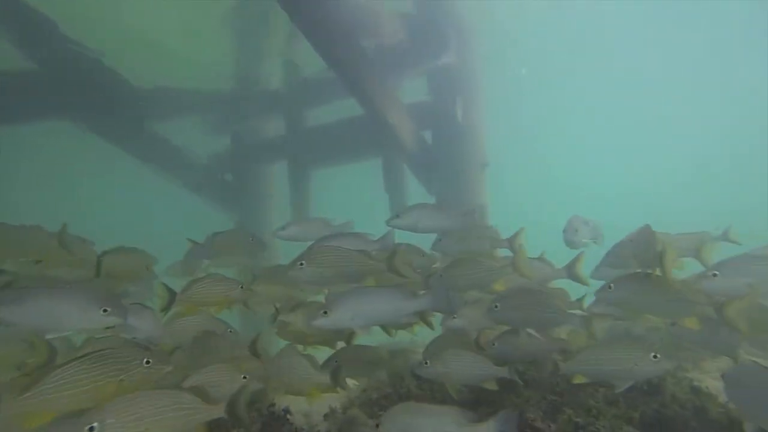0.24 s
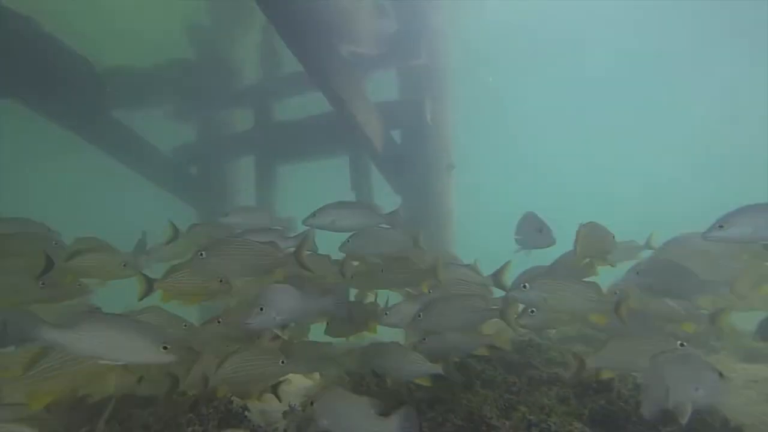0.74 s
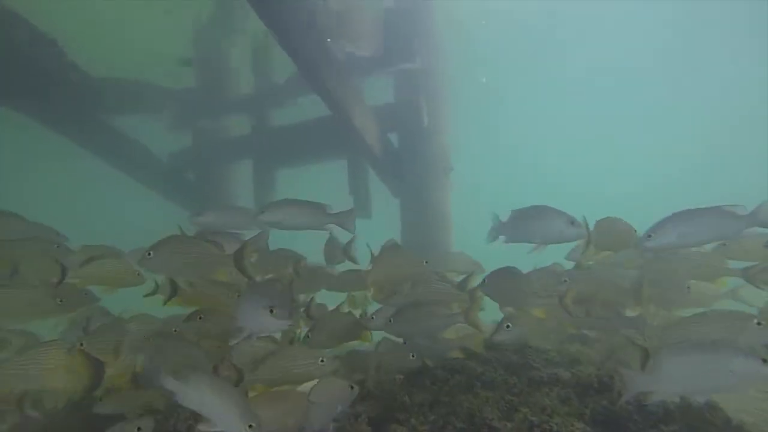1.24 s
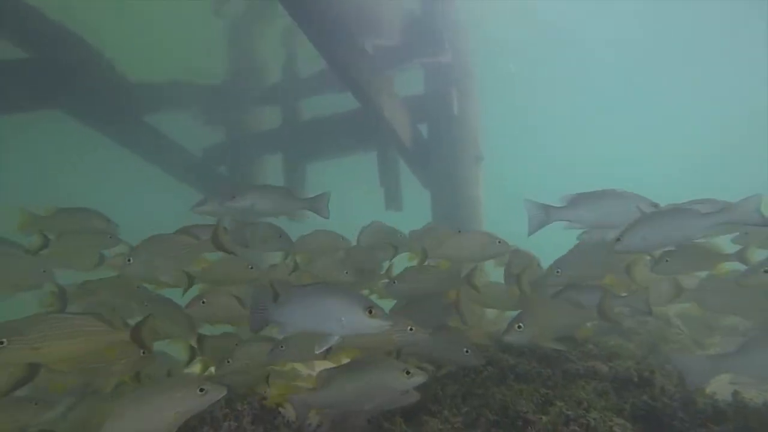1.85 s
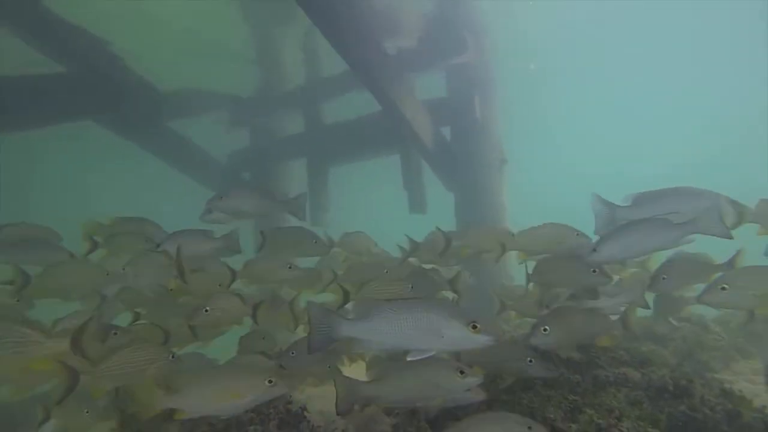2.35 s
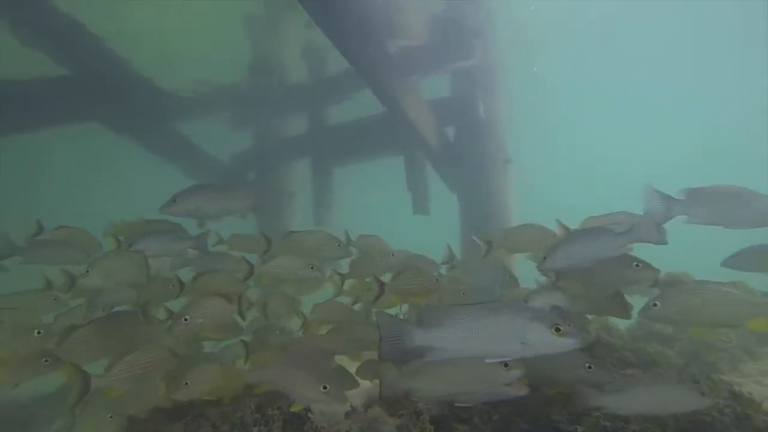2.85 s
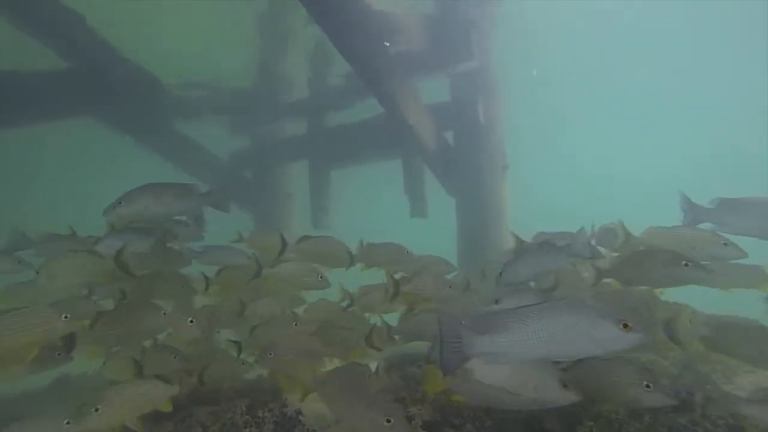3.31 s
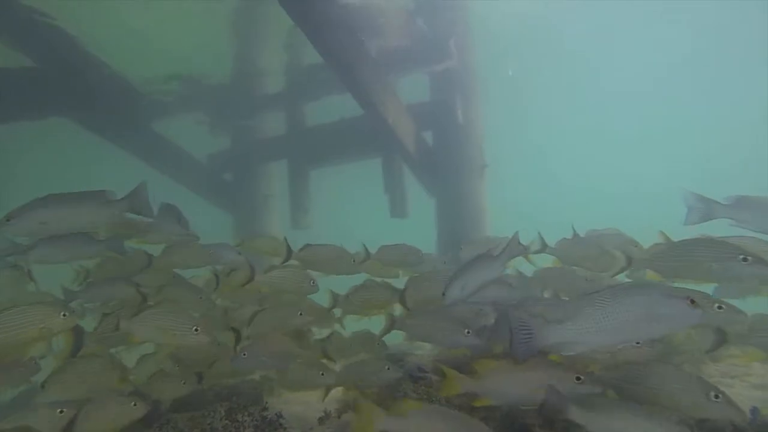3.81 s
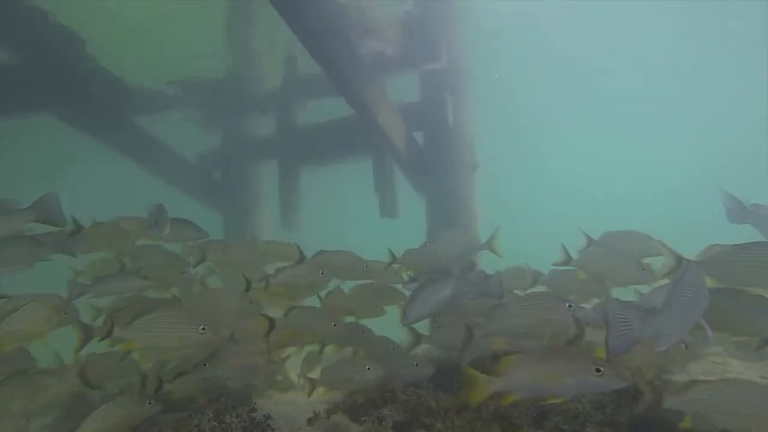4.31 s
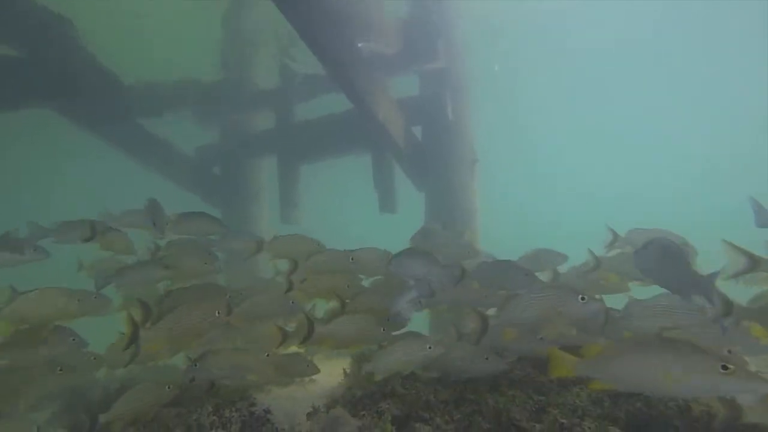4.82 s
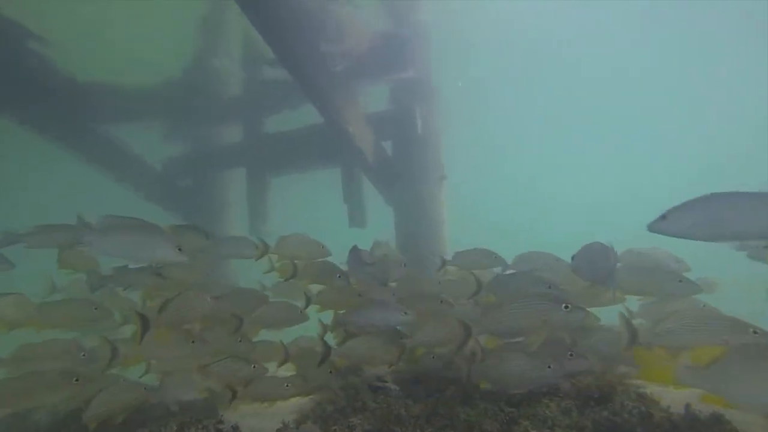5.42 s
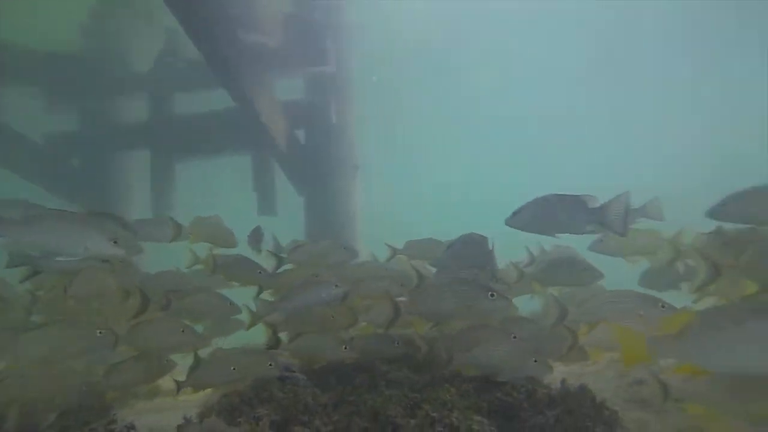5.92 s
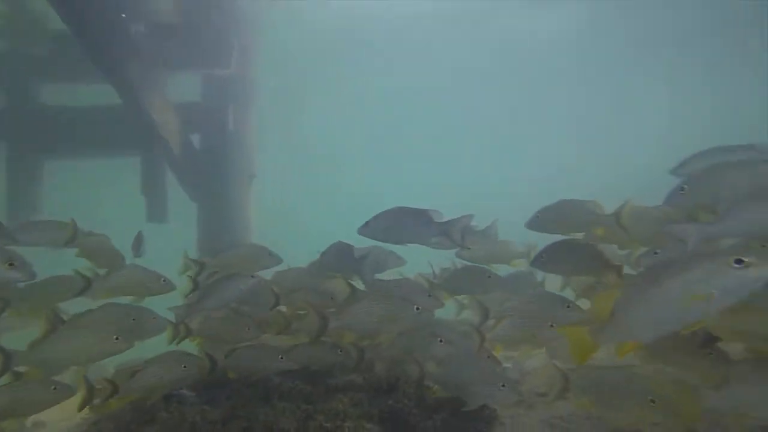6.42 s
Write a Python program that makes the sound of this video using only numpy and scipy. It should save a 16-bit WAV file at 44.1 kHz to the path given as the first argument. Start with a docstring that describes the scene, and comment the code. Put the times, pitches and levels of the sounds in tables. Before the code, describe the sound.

Two motorboats pass underwater, first near, then more distant, with swelling wash and gliding whine, while shrimp click over a low rumble.

```python
"""Under water beside a dock, heard through a camera housing: two motorboats pass, one close, one farther.
Each boat's distance sets its propeller wash, cavitation fizz and roar; its drive whine climbs and sinks.
The water rumbles and hisses, and a distant engine hums and throbs. The camera's electronics add a faint
pulsed whistle. Shrimp snap nearby: each collapsing bubble cracks, rings the housing and echoes."""
import sys
import numpy as np
from scipy import signal
from scipy.fft import rfft, irfft, next_fast_len
from scipy.io import wavfile
from scipy.ndimage import map_coordinates

SR = 44100
rng = np.random.default_rng(int(sys.argv[2]) if len(sys.argv) > 2 else 0)


def master(y):
    """Save y as 16-bit WAV."""
    cut = np.clip(np.atleast_2d(y).T, -1, 1)
    pcm = np.round(cut * 32767)  # scale
    wavfile.write(sys.argv[1], SR, pcm.astype(np.int16))


N = 293706


def amp(db):
    """Decibels to gain."""
    return 10 ** (np.asarray(db) / 20)


def along(points, hz):
    """Interpolate (freq_hz, value) points on a log axis."""
    freqs, values = np.transpose(points)
    return np.interp(np.log(hz + 1), np.log(freqs + 1), values)


def clock():
    """Sample times in seconds."""
    return np.arange(N) / SR


def curve(points):
    """Interpolate (time_s, value) points at every sample."""
    return np.interp(clock(), *np.transpose(points))


def wobble(rate_hz):
    """Smooth random curve, rate_hz knots a second."""
    knots = rng.standard_normal(int(N * rate_hz / SR) + 4)
    return map_coordinates(knots, [clock() * rate_hz])


def filtered(x, response):
    """Apply a gain given as a function of frequency."""
    size = next_fast_len(len(x) + 8192)
    return irfft(rfft(x, size) * response(np.fft.rfftfreq(size, 1 / SR)), size)[:len(x)]


def rush(spectrum):
    """Coloured noise, rms 1."""
    noise = filtered(rng.standard_normal(N), lambda hz: amp(along(spectrum, hz)))
    return noise / np.sqrt(np.mean(noise ** 2) + 1e-20)


def fuzzy_tone(pitch_hz, width_hz, rough):
    """Tone on a pitch curve; rough is the power share scattered into a narrow noise band."""
    scattered = np.sqrt(rough) * (wobble(width_hz) + 1j * wobble(width_hz))
    envelope = np.sqrt(2 * (1 - rough)) + scattered
    return np.real(envelope * np.exp(2j * np.pi * np.cumsum(pitch_hz) / SR))


def distance(closest_s, approach_s, leave_s):
    """Range on a straight course, in closest distances; the boat covers one in approach_s or leave_s."""
    since = clock() - closest_s
    return np.hypot(1, since / np.where(since < 0, approach_s, leave_s))


def range_gain(away, closest_db, loss_db):
    """Shallow water takes loss_db for each added closest distance."""
    return amp(closest_db - loss_db * (away - 1))


# boat roar spectrum: freq_hz, level_db
ROAR_SPECTRUM = [(120, -2.5), (200, 0), (330, -3.5), (410, 2), (510, -9), (600, 3), (680, -11.5),
                 (750, -5.5), (870, -27), (1200, -54.5)]


def roar(away, lowest_hz, reach, edge_db, edge_width):
    """Shallow water cuts the bass: the cutoff rises with range, and the roar dies beyond reach."""
    hz, frame_s, spectra = signal.stft(rush(ROAR_SPECTRUM), SR, nperseg=1024)
    cutoff_hz = np.interp(frame_s, clock(), lowest_hz * away)
    ratio = (hz[:, None] + 1) / cutoff_hz
    highpass = ratio ** 6 / (1 + ratio ** 6)
    edge = amp(edge_db * np.exp(-(np.log(ratio) / edge_width) ** 2))
    swept = signal.istft(spectra * highpass * edge, SR, nperseg=1024)[1][:N]
    return amp(2.5 * wobble(49.78)) * swept / (1 + (away / reach) ** 14)


# drive whine partials: harmonic, level_db
WHINE_PARTIALS = [(2, -13), (3, 0), (4, 0), (5, -17), (6, -13)]
# housing response: freq_hz, gain_db
HOUSING_RESPONSE = [(600, -8), (860, -20), (1030, -2.5), (1150, -9), (1300, -25), (1600, -14), (1800, -3),
                    (1980, 0), (2300, -9), (2700, -4), (3400, -10), (3900, -26)]


def drive_whine(pitch_hz, odd_db, rough):
    """Partials glide through the housing's resonances; multipath in the water adds blur and flutter."""
    whine = np.zeros(N)
    for harmonic, level_db in WHINE_PARTIALS:
        hz = harmonic * pitch_hz
        flutter_db = 2.5 * rough * wobble(16)
        gain = amp(level_db + harmonic % 2 * odd_db + along(HOUSING_RESPONSE, hz) + flutter_db)
        whine += gain * fuzzy_tone(hz, width_hz=90, rough=rough)
    return whine


# propeller wash spectrum: freq_hz, level_db
NEAR_WASH_SPECTRUM = [(470, -21), (800, -17), (873, -17), (992, 5), (1060, 3.5), (1150, -5), (1570, -1),
                      (1700, -0.5), (2010, 1), (2380, -23.5), (2670, -2), (3030, -13), (3340, 2.5),
                      (3820, -21.5), (4000, -43), (5200, -58), (8800, -120)]
# cavitation spectrum: freq_hz, level_db
NEAR_FIZZ_SPECTRUM = [(2240, -37), (3800, -10), (4250, 7.5), (4560, 0), (5280, 2.5), (5770, -6),
                      (6230, -9.5), (7650, -1.5), (8860, -10.5), (10700, -9.5), (11600, -13), (12600, -10),
                      (15500, -31)]
# brief swells of the roar: peak_s, boost_db
ROAR_SWELLS = [(.715, 3), (1.06, 6.5)]


def near_boat():
    """Churning wash, cavitation fizz, roar and whine swell as the close boat goes by."""
    away = distance(closest_s=1.02, approach_s=0.14, leave_s=0.112)
    churn_db = wobble(44.67)
    wash = range_gain(away, closest_db=-35.5, loss_db=4.55) * amp(churn_db) * rush(NEAR_WASH_SPECTRUM)
    fizz = range_gain(away, closest_db=-51, loss_db=4.4) * amp(2.5 * churn_db) * rush(NEAR_FIZZ_SPECTRUM)
    swell_db = sum(db * np.exp(-((clock() - peak_s) / 0.058) ** 2) for peak_s, db in ROAR_SWELLS)
    low_roar = roar(away, lowest_hz=163, reach=3.48, edge_db=6, edge_width=0.33)
    low_roar *= range_gain(away, closest_db=-33, loss_db=2.15) * amp(swell_db)
    cruise_hz, rise_hz, top_s, width_s = 338, 437, 0.99, 0.56
    pitch_hz = cruise_hz + rise_hz * np.exp(-np.abs((clock() - top_s) / width_s) ** 1.35)
    whine = range_gain(away, closest_db=-44.5, loss_db=2.9) * drive_whine(pitch_hz, odd_db=0, rough=0.38)
    return wash + fizz + low_roar + whine


# surges in the rumble: start_s, level_db
WATER_SURGES = [(.41, -46), (1.36, -45.5), (3.54, -53), (4.638, -50), (5.64, -48.5)]
# water rumble spectrum: freq_hz, level_db
RUMBLE_SPECTRUM = [(8.8, -24), (15, -0.5), (43, -1), (86, -2.5), (92, -2), (110, -4.5), (140, -16),
                   (240, -120)]
# water hiss spectrum: freq_hz, level_db
HISS_SPECTRUM = [(60, -19), (150, 2), (260, 1.5), (350, -6), (480, -3.5), (700, -2.5), (900, -13.5),
                 (3500, -28.5), (5000, -23), (9500, -35), (12800, -26), (13400, -24), (13800, -63)]


def water():
    """The sea's low rumble surges under a steady hiss."""
    floor_db, hiss_db, attack_s, decay_s = -56.5, -56.5, 0.01, 0.2
    rumble_gain = amp(floor_db)
    for start_s, level_db in WATER_SURGES:
        since = np.maximum(clock() - start_s, 0)
        surge = amp(level_db) * (1 - np.exp(-since / attack_s)) * np.exp(-since / decay_s)
        rumble_gain = np.hypot(rumble_gain, surge)
    return rumble_gain * rush(RUMBLE_SPECTRUM) + amp(hiss_db) * rush(HISS_SPECTRUM)


def engine_swell(middle_s=2.54, width_s=0.32):
    """The distant engine comes into hearing and stays: 0 to 1."""
    return 0.5 + 0.5 * np.tanh((clock() - middle_s) / width_s)


def distant_engine():
    """A hum that swells once and a throb that runs throughout."""
    faint_db, full_db, throb_db, beat_hz = -64, -56, -62, 6.6
    hum_db = faint_db + (full_db - faint_db) * engine_swell()
    hum = amp(hum_db) * fuzzy_tone(np.full(N, 120.5), width_hz=18, rough=0.2)
    beat = np.sin(2 * np.pi * beat_hz * clock() + 1.1 * wobble(3))
    throb = amp(throb_db + 7.5 * beat) * fuzzy_tone(np.full(N, 198.0), width_hz=60, rough=0.7)
    return hum + throb


def electronics():
    """The camera's faint, slightly drifting whistle switches on and off."""
    pitch_hz, burst_hz, offset_s, burst_s, ramp_s = 6432, 47.89, 2.6022, 0.0102, 0.0022
    since = (clock() - offset_s) % (1 / burst_hz)
    gate = np.clip(np.minimum(since, burst_s - since) / ramp_s, 0, 1)
    phase = 2 * np.pi * pitch_hz * clock() + 6.3 * wobble(11)
    return gate * (amp(-64.5) * np.sin(phase) + amp(-57.5) * np.sin(2 * phase))


# housing modes: freq_hz, level_db, t60_s
HOUSING_MODES = [(717, -6.5, 0.0086), (1046, -12.5, 0.015), (1715, 2, 0.0095), (1970, -2.5, 0.0073),
                 (2597, -11.5, 0.0085), (3250, -12.5, 0.0078), (4280, -22.5, 0.0061), (5240, -12, 0.0045),
                 (6550, -15, 0.0026)]
# bubble collapse spectrum: freq_hz, level_db
COLLAPSE_SPECTRUM = [(2000, -0.5), (4000, 13), (7000, 7.5), (8800, -3), (11500, 1), (13000, -6),
                     (15000, -22)]
# scattered echo spectrum: freq_hz, level_db
ECHO_SPECTRUM = [(200, -46), (450, -7.5), (700, -5.5), (1100, -10), (1300, -4), (1700, 4), (2300, -7),
                 (3400, -10.5), (4300, -19), (7500, -24.5), (13000, -37.5), (16000, -48)]


def snap(level_db, knock_db, body_db, crack_db, echo_t60_s=0.045):
    """A bubble collapses and rings the housing; pilings and seabed scatter a short echo."""
    t = np.arange(SR // 5) / SR
    colour = [(800, knock_db), (1000, body_db), (1500, 0), (2000, 0),
              (2700, crack_db), (4200, crack_db), (6000, 0.5)]  # freq_hz, gain_db
    ring = np.zeros(len(t))
    for k, (hz, mode_db, t60_s) in enumerate(HOUSING_MODES):
        decay = amp(mode_db + along(colour, hz) - 60 * t / t60_s)
        ring += (-1) ** k * decay * np.sin(2 * np.pi * hz * t)
    ring *= 1 - np.exp(-(t / 0.0025) ** 2)
    ring /= np.abs(ring).max()
    burst = amp(-24) * np.exp(-((t - 0.0012) / 0.00049) ** 2) * rng.standard_normal(len(t))
    collapse = filtered(burst, lambda hz: amp(along(COLLAPSE_SPECTRUM, hz)))
    noise = rng.standard_normal(len(t))
    echo = filtered(noise, lambda hz: amp(along(ECHO_SPECTRUM, hz) + along(colour, hz)))
    echo *= amp(-60 * t / echo_t60_s) * (1 - np.exp(-t / 0.00031))
    echo_db = -11 - 0.3179 * level_db  # weaker snaps are farther off, so more is echo
    echo *= amp(echo_db) * np.linalg.norm(ring) / np.linalg.norm(echo)
    return amp(level_db) * (ring + collapse + echo)


# shrimp snaps: start_s, level_db, knock_db, body_db, crack_db
SHRIMP_SNAPS = [(1.693, -35, 0, -12, 10), (1.899, -1.5, 3, 9.5, 2.5), (2.073, -26, 2, -14, 16),
                (2.153, -26, 3, 0, 12), (2.157, -12, 0, -5, 18.5), (2.167, -20, -3, -18, 11),
                (2.177, -21, 7, 4, 12), (2.185, -26, 12, 1, 12), (2.373, -26.5, -2.5, -12, -1),
                (2.529, -34.5, 3, -1, -8), (2.594, -40.5, -10, -4, 11), (2.929, -38.5, 0, -2, 6),
                (3.087, -7, 0, -13, 7.5), (3.227, -21.5, 1.5, -6, 3.5), (3.518, -31.5, 3.5, -1, -1),
                (3.703, -35.5, 5, -9, 5), (4.098, -14, -18, -15, -0.5), (4.235, -36, 0, 4, 14),
                (4.685, -30, 14, 2, 0), (4.721, -12.5, 5, -2, 3.5), (4.883, -3.5, 1.5, -10, 6.5),
                (4.906, -17.5, 2, -9, 6), (5.17, -26.5, 2, 2, 19), (5.273, -13.5, -5.5, -9, 0),
                (5.818, -36, 0, -4, 4)]


def shrimp():
    """Scattered snaps, each with its own strength and colour."""
    track = np.zeros(N + SR)
    for start_s, *levels_db in SHRIMP_SNAPS:
        sound = snap(*levels_db)
        track[round(start_s * SR):][:len(sound)] += sound
    return track[:N]


# whine fundamental: time_s, pitch_hz
FAR_WHINE_PITCH = [(4.05, 339), (4.25, 362), (4.45, 446), (4.78, 577), (4.82, 577), (4.98, 500),
                   (5.45, 417), (5.9, 369), (6.66, 340)]


def far_whine(distant_db):
    """Near the pass the whine stands clear of the wash: louder, purer, weaker in its odd partials."""
    clear_s, width_s, blurred_rough, clear_rough = 4.87, 0.4, 0.75, 0.12
    progress = (clock() - clear_s) / width_s
    clear = np.exp(-progress ** 4)
    leaving = np.clip(progress, 0, 1)
    rough = blurred_rough + (clear_rough - blurred_rough) * clear
    gain = np.hypot(amp(distant_db - 3) * engine_swell(), amp(-38.5) * clear)
    return gain * drive_whine(curve(FAR_WHINE_PITCH), odd_db=-11 * clear - 2.5 * leaving, rough=rough)


# long-range wash, with a brief dip: time_s, level_db
DISTANT_WASH_LEVEL = [(0, -57.5), (1.85, -52.5), (1.95, -54.5), (2.1, -58), (2.25, -49), (3.4, -51.5),
                      (4.3, -51), (6, -46.5), (6.66, -47.5)]
# propeller wash spectrum: freq_hz, level_db
FAR_WASH_SPECTRUM = [(260, -13.5), (450, -44), (587, -10.5), (918, -19.5), (988, -11.5), (1030, -3.5),
                     (1310, -26.5), (2000, 4.5), (2270, -7.5), (2580, -7), (2960, -11.5), (3390, -7.5),
                     (3580, -14), (3790, -66), (4000, -24), (5200, -45), (8800, -120)]
# cavitation spectrum: freq_hz, level_db
FAR_FIZZ_SPECTRUM = [(3000, -22), (3800, 1), (4400, 8.5), (5300, 5.5), (6000, -11), (8000, -6),
                     (10000, -19), (13000, -7), (15000, -42)]


def far_boat():
    """The farther boat rises out of the distant wash; its fizz and thin roar peak while it is nearest."""
    away = distance(closest_s=4.69, approach_s=0.078, leave_s=0.37)
    distant_db = curve(DISTANT_WASH_LEVEL)
    wash_gain = np.hypot(range_gain(away, closest_db=-42, loss_db=2.95), amp(distant_db))
    fizz_gain = np.hypot(range_gain(away, closest_db=-64.5, loss_db=7.8), amp(distant_db - 25))
    thin_roar = roar(away, lowest_hz=400, reach=3, edge_db=-0.5, edge_width=0.4)
    thin_roar *= range_gain(away, closest_db=-53, loss_db=5)
    churn = amp(1.46 * wobble(25))
    propeller = wash_gain * rush(FAR_WASH_SPECTRUM) + fizz_gain * rush(FAR_FIZZ_SPECTRUM)
    return churn * propeller + thin_roar + far_whine(distant_db)


def scene():
    """All sources at one microphone."""
    return (near_boat() + water() + distant_engine() + electronics() + shrimp() + far_boat())[None]


def record(dry):
    """The camera keeps nothing above its band limit."""
    top_hz = 15600
    return np.array([filtered(channel, lambda hz: hz < top_hz) for channel in dry])


dry = scene()
out = record(dry)
master(out)
```